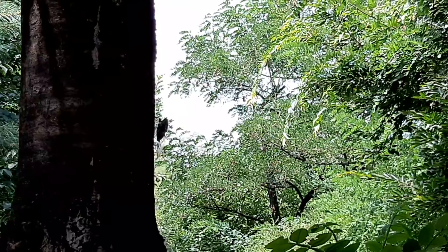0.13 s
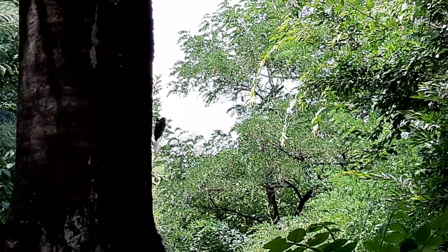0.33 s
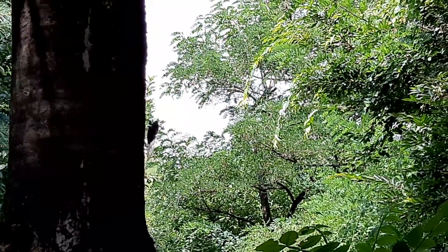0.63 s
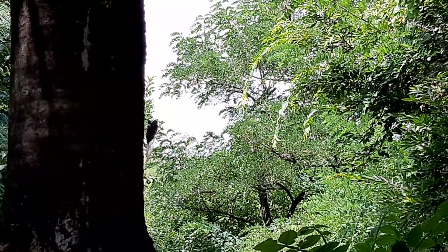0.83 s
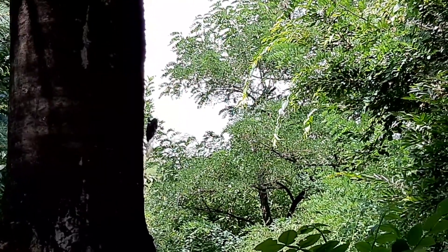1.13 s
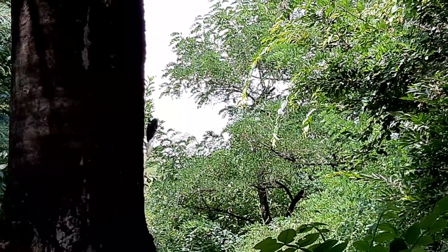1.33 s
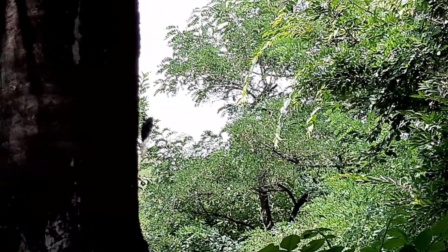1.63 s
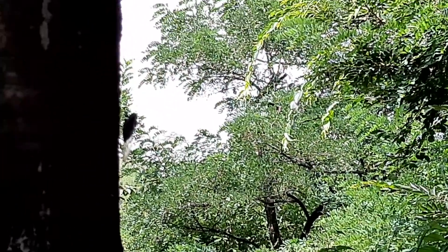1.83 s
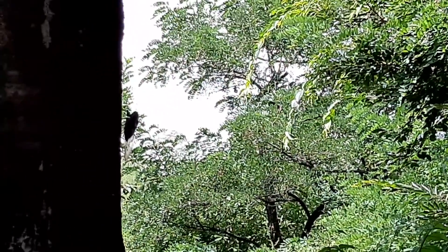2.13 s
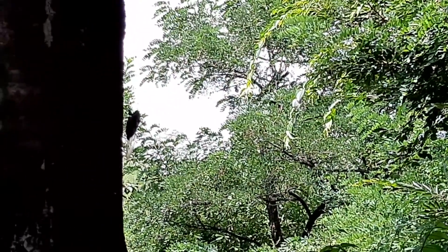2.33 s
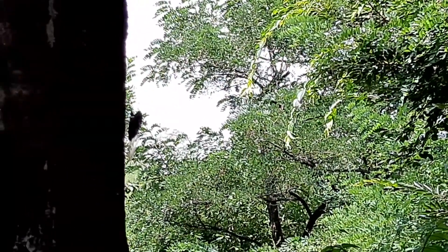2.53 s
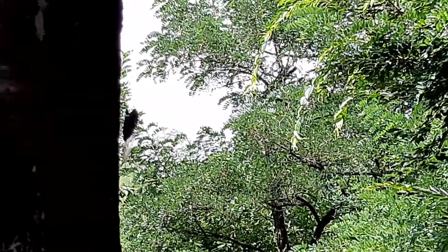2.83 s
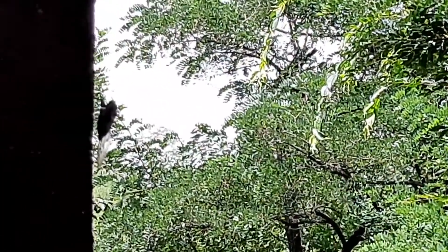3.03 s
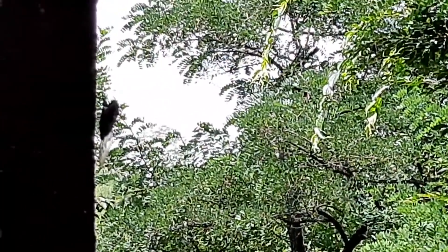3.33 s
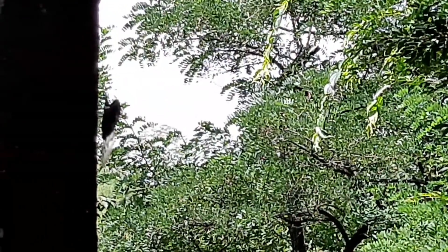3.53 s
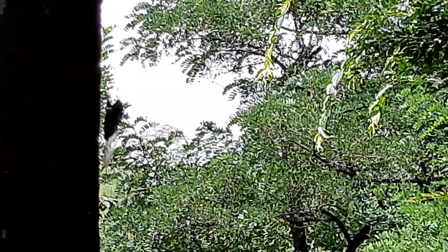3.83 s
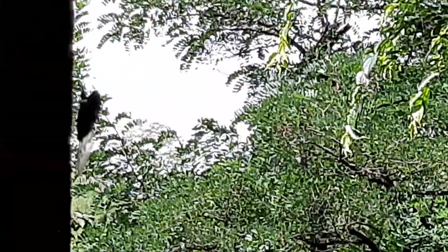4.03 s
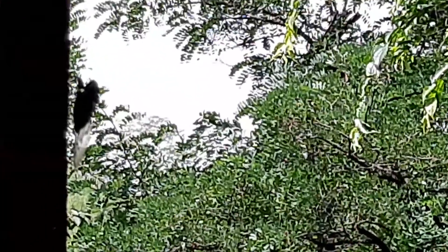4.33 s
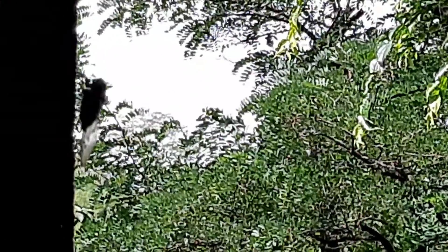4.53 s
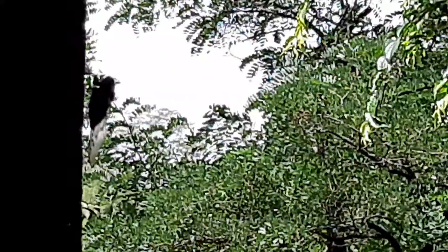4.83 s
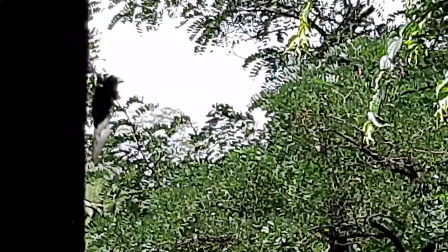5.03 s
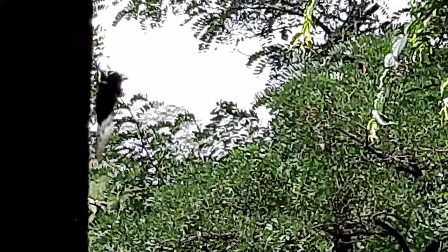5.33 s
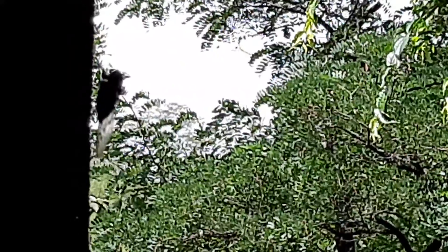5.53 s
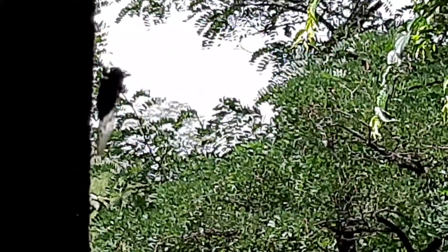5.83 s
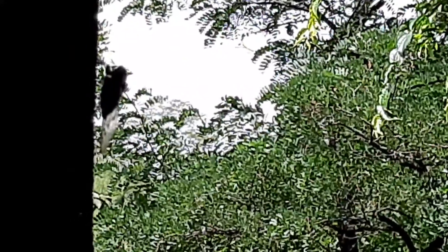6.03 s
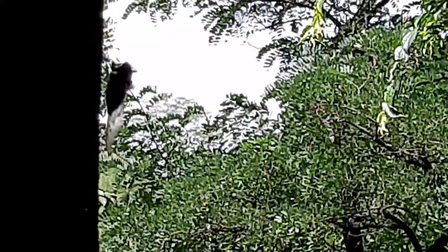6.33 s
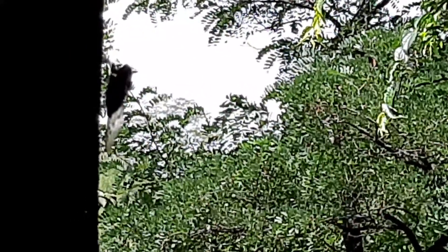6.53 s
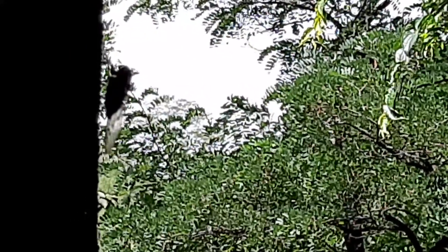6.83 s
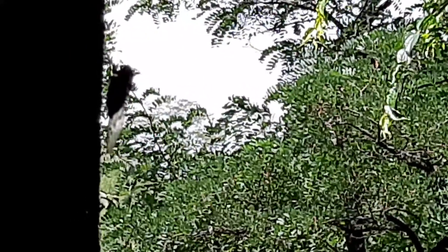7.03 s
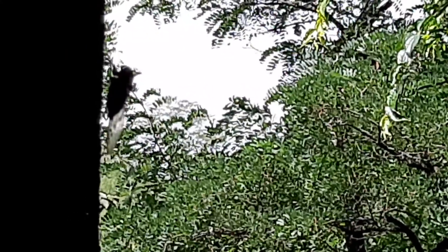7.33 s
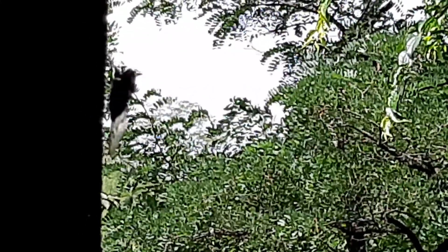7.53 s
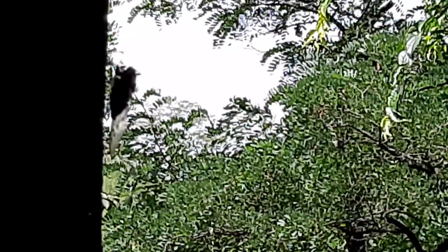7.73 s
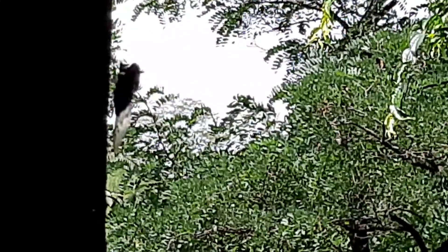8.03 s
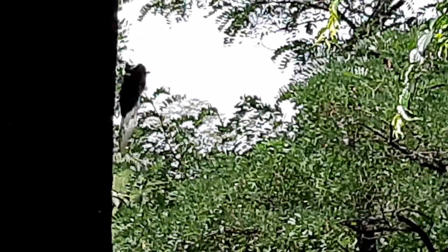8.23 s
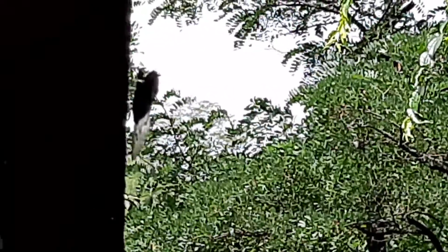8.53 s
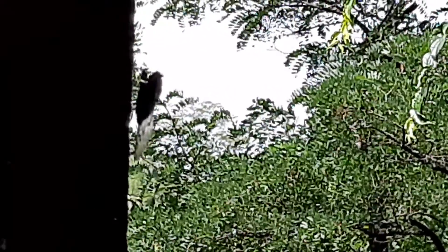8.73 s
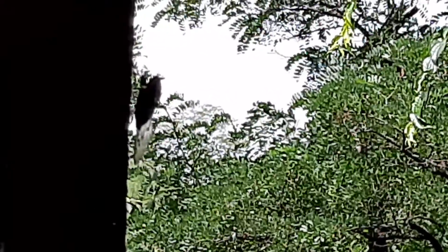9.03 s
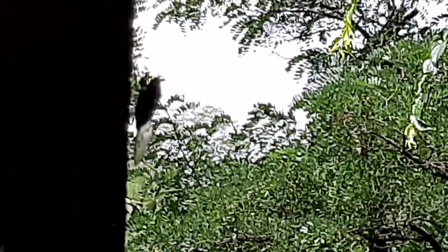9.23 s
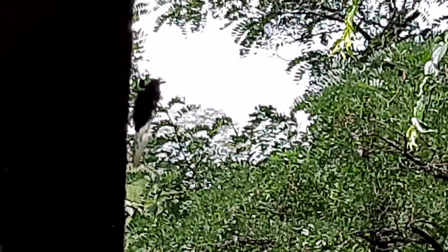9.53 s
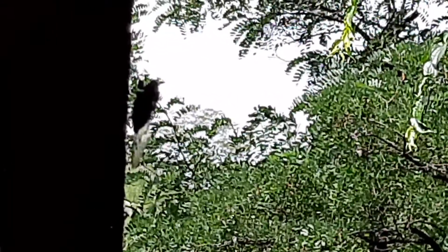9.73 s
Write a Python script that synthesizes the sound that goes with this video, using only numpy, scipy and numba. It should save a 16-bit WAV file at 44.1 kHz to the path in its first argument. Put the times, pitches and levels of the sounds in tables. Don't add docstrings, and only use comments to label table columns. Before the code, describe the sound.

Several cicadas overlap among trees: swelling, hissy shrill bursts cut into brief nasal buzzes that rise and sink in pitch. Near singers alternate from left and right, their phrases ending in a slowing, fading rattle. A more echoing third singer and a continuous blurred chorus fill the gaps. Faint hoarse rising chirps and soft town rumble sit far below. Wide handheld stereo pickup, bright with a sharply limited top, short leafy echoes.

```python
import sys
import numpy as np
from scipy import signal
from scipy.fft import rfft, irfft, next_fast_len
from scipy.io import wavfile
from scipy.ndimage import uniform_filter1d
from numba import njit

SR = 44100
rng = np.random.default_rng(int(sys.argv[2]) if len(sys.argv) > 2 else 0)


def int16_out(signal):
    q = np.round(np.clip(np.atleast_2d(signal).T, -1, 1) * 32767)
    wavfile.write(sys.argv[1], SR, q.astype(np.int16))


def magnitude_from_level(level_db):
    exponent = np.asarray(level_db, float) / 20
    return 10 ** exponent


N = 436590

PORT_LAG = {"left": -11, "right": 20, "far": 18, "town": -15}

# start_s, length_s, level_db, click_rate_hz, left_minus_right_db
LEFT_SWINGS = [(0.454, 0.17, -37, 354.3, 2), (0.935, 0.2, -40, 359.8, 8), (1.547, 0.15, -38.5, 338.6, 1.5),
               (1.937, 0.19, -34, 358.2, -2.1), (2.352, 0.21, -34, 367.6, 1.5),
               (2.748, 0.22, -33.5, 369.8, 4.5), (3.162, 0.19, -33, 367.2, 3), (3.54, 0.2, -33, 366.7, 1.0),
               (3.931, 0.2, -32.5, 362, -1), (4.304, 0.22, -32, 364.5, 0.5), (8.617, 0.17, -33, 368, -1.5),
               (9.009, 0.18, -29, 373.2, 5.5), (9.395, 0.16, -30.5, 368.3, 0.5),
               (9.748, 0.22, -30.5, 374.2, 1)]
# end_s, length_s,
# level_db
LEFT_BURSTS = [(.22, .3, -42), (.63, .25, -45), (1.16, .25, -42), (1.6, 0.25, -37), (2.035, 0.37, -37),
               (2.41, 0.25, -35.5), (2.79, 0.36, -37), (3.16, 0.27, -33.5), (3.52, 0.34, -33),
               (3.914, 0.27, -33.5), (4.28, 0.27, -31.5), (4.648, 0.29, -33), (4.985, 0.3, -41.5),
               (5.506, 0.42, -36), (5.69, .12, -46), (6.05, 0.23, -48), (6.651, 0.33, -39.5),
               (7.07, 0.24, -38), (7.45, 0.19, -38), (8.633, 0.33, -52.5), (9, 0.2, -37),
               (9.378, 0.22, -32.5), (9.728, 0.24, -32)]
# start_s, length_s, first_click_rate_hz, level_db, abdomen_hz
LEFT_ENDINGS = [
    (4.619, 1.23, 364.6, -32, 4260),
]


def left_cicada():
    arch = dict(low_hz=2870, high_hz=5010, peak_at=0.41, rise=0.19, fall=0.5, sink=0.97)
    return singer(LEFT_SWINGS, LEFT_BURSTS, LEFT_ENDINGS, PORT_LAG["left"], arch,
                  shrill_pan_db=7.1, ending_pan_db=0.0, lower_db=-5.5, upper_db=-10)


# start_s, length_s, level_db, click_rate_hz, left_minus_right_db
RIGHT_SWINGS = [
    (0.205, 0.22, -38, 323.3, 0.5),
    (0.74, 0.18, -33.5, 341, -10),
    (1.265, 0.2, -32.5, 333, -6),
    (1.761, 0.13, -35.5, 317.4, -20),
    (5.329, 0.25, -33.5, 336, -9),
    (5.84, 0.2, -30.5, 363.2, -6),
    (6.339, 0.2, -33.5, 347.5, -5),
    (6.854, 0.22, -29, 368.2, -7.5),
    (7.354, 0.19, -28.5, 362, -4),
    (7.829, 0.17, -28.5, 349.8, -19),
]
# end_s, length_s, level_db
RIGHT_BURSTS = [(.46, .2, -46), (.88, 0.34, -40), (1.33, 0.35, -39), (1.88, 0.36, -58), (3.83, 0.1, -34),
                (4.32, 0.25, -35.5), (4.899, .3, -41), (5.38, 0.32, -39), (5.84, 0.37, -36.5),
                (6.29, 0.33, -37), (6.87, .4, -41.5), (7.37, 0.33, -41), (7.84, 0.32, -41.5),
                (9.29, .12, -50), (9.75, 0.29, -36)]
# start_s, length_s, first_click_rate_hz, level_db, abdomen_hz
RIGHT_ENDINGS = [
    (1.9, 1.3, 317.8, -39.5, 4500),
    (7.94, 1.64, 350.6, -35, 4490),
]


def right_cicada():
    arch = dict(low_hz=3140, high_hz=5090, peak_at=0.41, rise=0.14, fall=0.61, sink=0.81)
    return singer(RIGHT_SWINGS, RIGHT_BURSTS, RIGHT_ENDINGS, PORT_LAG["right"], arch,
                  shrill_pan_db=-1.2, ending_pan_db=-6.5, lower_db=-8, upper_db=-15)


# frequency_hz, level_db
SHRILL = [(5000, -75), (8400, -31), (9100, -29.5), (10200, -22.5), (11500, -12), (13100, -1.5), (15100, -1),
          (15700, 1)]


def singer(table, shrill, ending, lag, arch, shrill_pan_db, ending_pan_db, lower_db, upper_db):
    clicks, out = swung(table, lag, arch, 8.0, lower_db, upper_db, bark_db=-13, wood_db=-11)

    shrill_db = bursts(shrill)
    clear = np.clip((shrill_db + 46) / 15, .3, .92)
    hiss = colour(rng.standard_normal(N), SHRILL)
    snap = clear * colour(clicks, SHRILL) + np.sqrt(1 - clear ** 2) * hiss
    out += heard(magnitude_from_level(shrill_db) * snap, lag, shrill_pan_db, bark_db=-1, wood_db=-6)

    rate, level, sac_hz = endings(ending)
    slow = tymbals(rate * (1 + 0.013 * walk(9)), jitter_s=3e-5, scatter_db=0.0)
    close = level * abdomen(slow, sac_hz, upper_db=-14, sharp=6.0, lower_db=-9)
    return out + heard(close, lag, ending_pan_db, bark_db=-6, wood_db=-4)


def swung(table, lag, arch, sharp, lower_db, upper_db, bark_db, wood_db):
    clicks = tymbals(curve(table, 3) * (1 + .003 * walk(6)), jitter_s=6e-6, scatter_db=1.5)
    gain, hz = swings(table, **arch)
    pan_db = curve(table, 4)
    song = gain * magnitude_from_level(1 - np.abs(pan_db) / 2) * abdomen(clicks, hz, upper_db, sharp, lower_db)
    return clicks, heard(song, lag, pan_db, bark_db, wood_db)


def tymbals(hz, jitter_s, scatter_db, weak_db=2.0, late=0.034):
    phase = np.cumsum(hz) / SR
    k = np.arange(1, int(phase[-1]))
    chance = rng.standard_normal((2, len(k)))
    at = np.interp(k + late * (k % 2), phase, np.arange(N)) + jitter_s * SR * chance[0]
    level = magnitude_from_level(weak_db * (k % 2) + scatter_db * chance[1])
    taps = np.floor(at).astype(int)[:, None] + np.arange(-7, 9)
    offset = taps - at[:, None]
    click = np.sinc(offset) * np.cos(np.pi * offset / 17) ** 2 * level[:, None]
    return np.bincount(np.clip(taps, 0, N - 1).ravel(), click.ravel(), N) * np.sqrt(SR / hz)


def swings(table, low_hz, high_hz, peak_at, rise, fall, sink):
    t, gain, lift = np.arange(N) / SR, np.zeros(N), np.zeros(N)
    for start, length, db, _, _ in table:
        u = np.clip((t - start) / length, 0, 1)
        edge = np.clip(np.minimum(u / rise, (1 - u) / fall), 0, 1)
        gain += magnitude_from_level(db) * np.sin(np.pi / 2 * edge)
        turn = u ** (np.log(.5) / np.log(peak_at))
        lift += np.sin(np.pi * np.minimum(turn, .5 + sink * (turn - .5))) * (u < 1)
    return gain, low_hz + (high_hz - low_hz) * lift


# frequency_hz, level_db
UPPER = [(4800, -33), (5500, -8.5), (6200, 0.5), (6900, -1), (7200, -9), (7600, -18.5), (8000, -28),
         (11000, -33)]


def abdomen(clicks, hz, upper_db, sharp, lower_db):
    breath = .12 * np.std(clicks) * rng.standard_normal(N)
    rough = clicks * (1 + .15 * walk(900)) + breath
    sac = unit(svf(svf(rough, hz, sharp), hz, .7 * sharp))
    lower = unit(svf(svf(rough, .79 * hz, 5.0), .79 * hz, 4.0))
    sac_top = signal.butter(6, 6500, fs=SR, output="sos")
    both = signal.sosfilt(sac_top, sac - magnitude_from_level(lower_db) * lower)
    return unit(both) + magnitude_from_level(upper_db) * colour(rough, UPPER)


def bursts(table):
    attack_s, release_s, swell_db, rest_db = 0.13, 0.078, 4.5, -49.5
    t, gain = np.arange(N) / SR, magnitude_from_level(rest_db)
    for end, length, db in table:
        u = np.clip((t - end) / length, -1, 0)
        onset = ramp((t - end + length) / attack_s)
        cut = ramp(1 + (end - t) / release_s)
        gain = gain + magnitude_from_level(db + swell_db * u) * onset * cut
    return 20 * np.log10(gain)


def endings(table):
    sag_hz_per_s, slowest_hz, knee_hz = 165, 142.4, 24.76
    attack_s, release_s, fade_db_per_s = .09, 0.083, 7.5
    t = np.arange(N) / SR
    start, length, first_hz, db, sac_hz = latest(table)
    age = np.maximum(t - start, 0)
    above_hz = first_hz - slowest_hz - sag_hz_per_s * age
    rate = slowest_hz + knee_hz * np.logaddexp(0, above_hz / knee_hz)
    gain = magnitude_from_level(db - fade_db_per_s * age + 2.0 * walk(5.7))
    gain = gain * ramp(age / attack_s) * ramp((length - age) / release_s)
    return rate, gain, sac_hz * (1 + .02 * walk(6))


# start_s, length_s, level_db, click_rate_hz, left_minus_right_db
FAR_SWINGS = [(-.04, 0.13, -36.5, 346, 1.4), (.88, 0.16, -34.5, 345.4, -0.81), (1.15, 0.19, -46, 343.7, 1),
              (1.36, 0.16, -39, 347.4, 0.97), (1.5, .14, -35.5, 344.6, -1.3), (4.68, 0.15, -38, 344.1, 2),
              (4.92, 0.15, -36.5, 345.4, -0.38), (5.44, .16, -40, 340, 1), (5.77, .13, -48, 346.6, 0),
              (5.98, 0.15, -35, 347.7, 1), (6.23, 0.22, -38.5, 344.7, 0.11), (6.67, 0.17, -36, 343.5, 1),
              (7.05, 0.21, -35, 345.5, -1.87), (7.52, .2, -37, 342, -2.28), (8.15, 0.22, -35, 346.5, -1.25)]


def far_cicada():
    arch = dict(low_hz=3320, high_hz=4790, peak_at=0.38, rise=0.18, fall=0.52, sink=0.88)
    clicks, song = swung(FAR_SWINGS, PORT_LAG["far"], arch, 9.0, lower_db=-6.5, upper_db=-15.5,
                         bark_db=-4.5, wood_db=-2.5)
    return song


# start_s, level_db
CHORUS = [
    (0, -36),
    (.8, -35.5),
    (1.6, -32.5),
    (2.9, -33.5),
    (4.3, -34),
    (5.6, -35),
    (6.6, -34),
    (7.7, -33.5),
    (8.8, -34),
    (9.9, -33.5),
]
# middle_s, rise_db, left_minus_right_db
SURGES = [
    (.27, 2, -3),
    (1.2, -0.5, 0.5),
    (1.85, 0.5, -2),
    (4.75, -1, -1),
    (5.9, 2, 0),
    (6.4, 3, -1),
    (7.42, 1, -1),
    (7.88, 0.5, 2),
    (8.63, 1.5, .5),
    (9.62, 1.5, 0),
]
# frequency_hz, level_db
BUZZ = [(900, -62), (1400, -35), (2100, -24), (2600, -15.5), (3300, -7), (4300, -2), (4850, -1), (5250, -7),
        (5600, -17), (7300, -45)]


def chorus(count=7):
    out = np.zeros((2, N))
    for rate_hz, lag in zip(rng.uniform(250, 370, count), rng.integers(-22, 23, count)):
        clicks = tymbals(rate_hz * (1 + .03 * walk(1.5)), jitter_s=4e-5, scatter_db=3.0)
        clicks = clicks * magnitude_from_level(1.8 * walk(5))
        rung = clicks + 1.2 * svf(clicks, 4300 * (1 + .1 * walk(4)), 6.0)
        out += np.array([np.roll(rung, lag), rung])
    out = heard(out, 0, 0, bark_db=-4, wood_db=4)

    t = np.arange(N) / SR
    bells = [np.exp(-((t - start) / 0.092) ** 2) for start, _, _ in SURGES]
    surge_db, pan_db = np.array(SURGES)[:, 1:].T @ bells
    buzz = magnitude_from_level(surge_db) * colour(out, BUZZ)
    upper = magnitude_from_level(-12.5 + 1.5 * surge_db) * colour(out, UPPER)
    shrill = magnitude_from_level(-42) * colour(out, SHRILL)
    side = np.array([[.5], [-.5]])
    return (buzz + upper) * magnitude_from_level(curve(CHORUS) + side * (0.5 + pan_db)) + shrill


# start_s, length_s, level_db, first_pitch_hz
CHIRPS = [(0.427, 0.091, -61, 1810), (1.4, 0.14, -62.5, 1610), (2.398, .07, -59, 1710),
          (3.297, .085, -61, 1690), (4.118, 0.13, -61, 1670), (4.97, 0.091, -60.5, 1660),
          (5.077, 0.079, -65, 1720), (5.786, 0.061, -62, 1650), (6.515, 0.068, -60, 1730),
          (7.172, 0.12, -59, 1740), (9.225, 0.078, -61, 1730)]


def chirps():
    rise_hz_per_s = 870
    t = np.arange(N) / SR
    start, length, db, first_hz = latest(CHIRPS)
    hz = first_hz + rise_hz_per_s * np.clip(t - start, 0, length)
    hz = hz * (1 + 0.049 * walk(40))
    gain = magnitude_from_level(db) * (t > start) * (t < start + length)
    note = unit(svf(svf(rng.standard_normal(N), hz, 4.1), hz, 4.1))
    return heard(uniform_filter1d(gain, 600) * note, 0, 0, bark_db=-2.0, wood_db=-6.0) * magnitude_from_level(-0.5)


# frequency_hz, level_db
TOWN = [(12, -56), (20, -16), (47, -4), (102, 0.5), (242, 1), (347, -6.5), (604, -12.5), (744, -17),
        (915, -17), (1250, -27), (1620, -28), (2750, -120)]
# start_s, hum_level_db
TRAFFIC = [
    (0, -58.5),
    (2.2, -61),
    (3.2, -59.5),
    (4.3, -60),
    (5.4, -60.5),
    (6.5, -62),
    (6.9, -60),
    (8.4, -58.5),
    (9.9, -54.5),
]
# middle_s, level_db, pitch_hz, length_s
THUDS = [
    (1.56, -53, 55, 0.046),
    (3.29, -53, 55, .09),
    (6.01, -55, 400, 0.083),
    (7.164, -52, 62, 0.11),
    (8.095, -59, 38, 0.21),
]


def town():
    t = np.arange(N) / SR
    common, *apart = rng.standard_normal((3, N))
    diffuse = signal.sosfilt(signal.butter(1, 900, "high", fs=SR, output="sos"), np.array(apart))
    arriving = np.array([np.roll(common, PORT_LAG["town"]), common])
    both = colour(arriving + 1.07 * diffuse, TOWN)
    rumble = signal.sosfiltfilt(signal.butter(2, 350, fs=SR, output="sos"), both)
    hum = unit(both - rumble)

    thuds = np.zeros(N)
    for start, db, hz, length in THUDS:
        thuds += magnitude_from_level(db) * np.exp(-((t - start) / length) ** 2) * np.sin(2 * np.pi * hz * t)

    hum_db = curve(TRAFFIC) + 5 * np.exp(-((t - 3.92) / 0.099) ** 2)
    rumble_db = -56 + 0.14 * (curve(TRAFFIC) - np.mean(hum_db)) + 1.04 * walk(6.7)
    return magnitude_from_level(rumble_db) * unit(rumble) + magnitude_from_level(hum_db) * hum + thuds


def echoes(t60_s):
    t = np.arange(SR // 3) / SR
    tail = rng.standard_normal((2, len(t))) * np.exp(-np.log(1000) * t / t60_s)
    return tail / np.sqrt(np.sum(tail ** 2, axis=1, keepdims=True))


def heard(x, lag, pan_db, bark_db, wood_db):
    path = magnitude_from_level(bark_db) * echoes(.05) + magnitude_from_level(wood_db) * echoes(.22)
    path[0, max(lag, 0)] += 1
    path[1, max(-lag, 0)] += 1
    path /= np.sqrt(np.sum(path ** 2, axis=1, keepdims=True))
    ports = signal.oaconvolve(np.atleast_2d(x), path, axes=1)[:, :N]
    return ports * magnitude_from_level(np.array([[.5], [-.5]]) * pan_db)


def curve(table, col=1):
    rows = np.array(table, float)
    return np.interp(np.arange(N) / SR, rows[:, 0], rows[:, col])


def latest(table):
    rows = np.array(table)
    index = np.searchsorted(rows[:, 0], np.arange(N) / SR) - 1
    return rows[np.clip(index, 0, None)].T


def unit(x):
    return x / np.sqrt(np.mean(x ** 2))


def ramp(x):
    return np.sin(np.pi / 2 * np.clip(x, 0, 1)) ** 2


def colour(x, shape):
    size = next_fast_len(N)
    hz, db = np.transpose(shape)
    bins_hz = np.arange(size // 2 + 1) * SR / size
    gain = magnitude_from_level(np.interp(np.log(bins_hz + 1), np.log(hz), db))
    return unit(irfft(rfft(x, size) * gain, size)[..., :N])


@njit
def svf(x, hz, sharp):
    y, band, low, k = np.empty(len(x)), 0., 0., 1 / sharp
    for i in range(len(x)):
        g = np.tan(np.pi * hz[i] / SR)
        v = (band + g * (x[i] - low)) / (1 + g * (g + k))
        band, low, y[i] = 2 * v - band, low + 2 * g * v, k * v
    return y


def walk(rate):
    k = int(SR / rate)
    held = np.repeat(rng.standard_normal(N // k + 1), k)
    return unit(uniform_filter1d(uniform_filter1d(held, k), k)[:N])


def scene():
    return left_cicada() + right_cicada() + far_cicada() + chorus() + chirps() + town()


def band_limit(x):
    return signal.sosfilt(signal.butter(12, 15800, fs=SR, output="sos"), x)


def record(dry):
    top = signal.ellip(12, .3, 80, 15790, fs=SR, output="sos")
    mix = signal.sosfilt(top, dry)
    return band_limit(mix)


dry = scene()
out = record(dry)
int16_out(out)
```